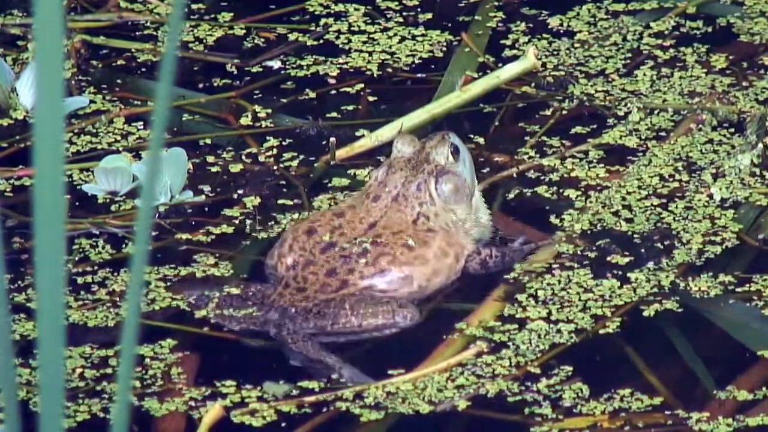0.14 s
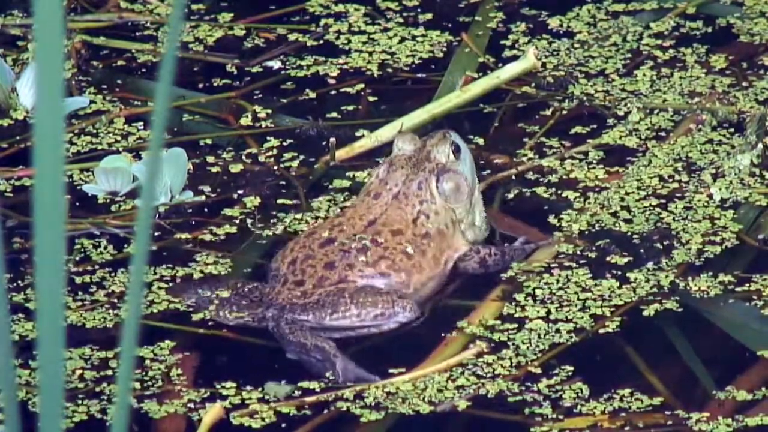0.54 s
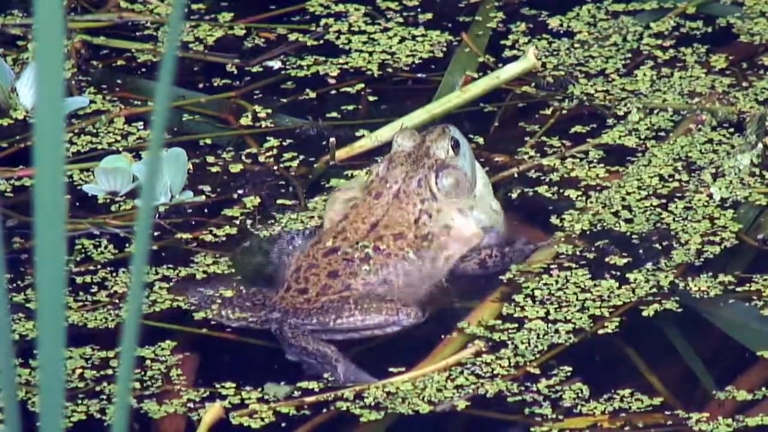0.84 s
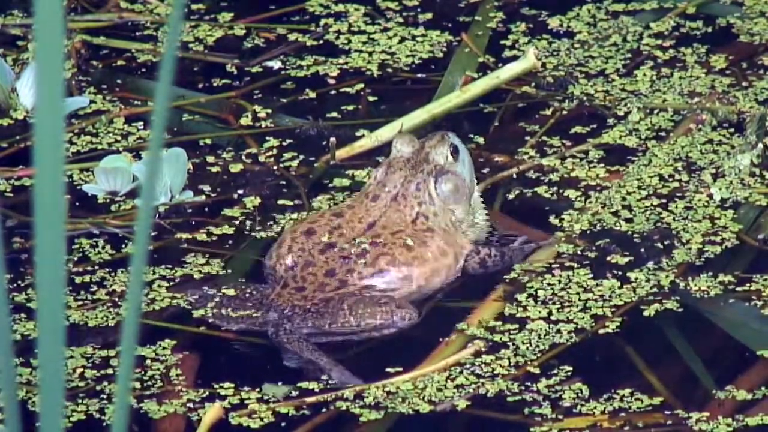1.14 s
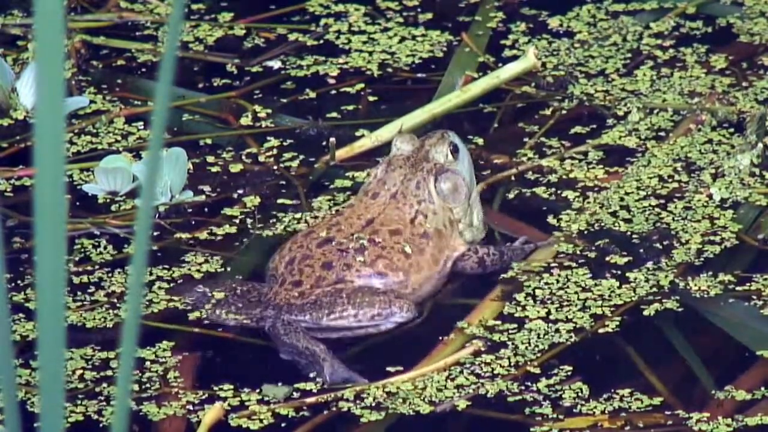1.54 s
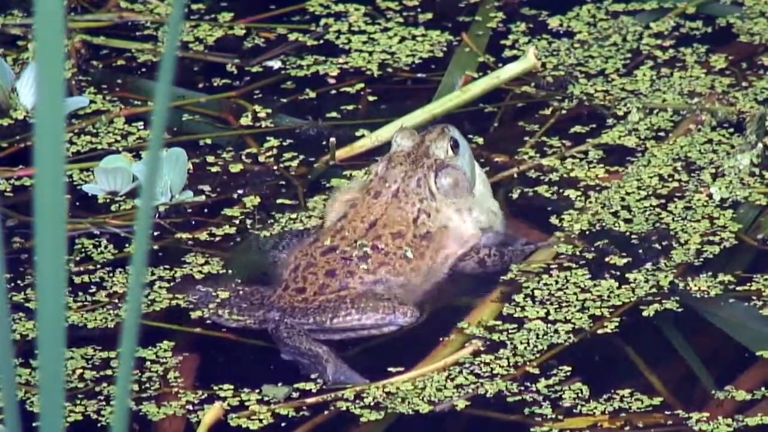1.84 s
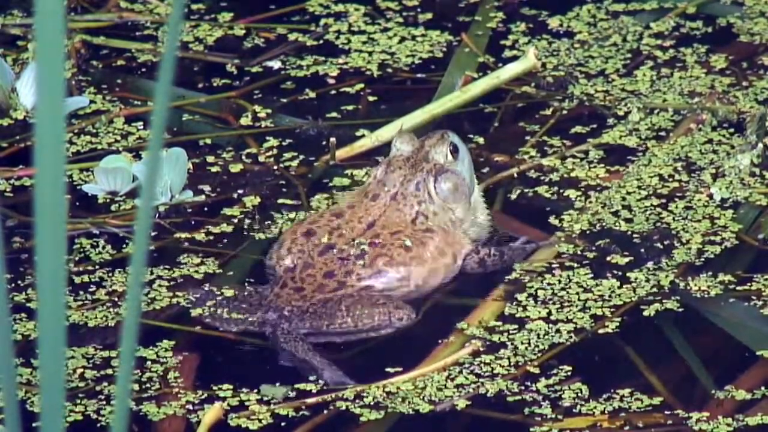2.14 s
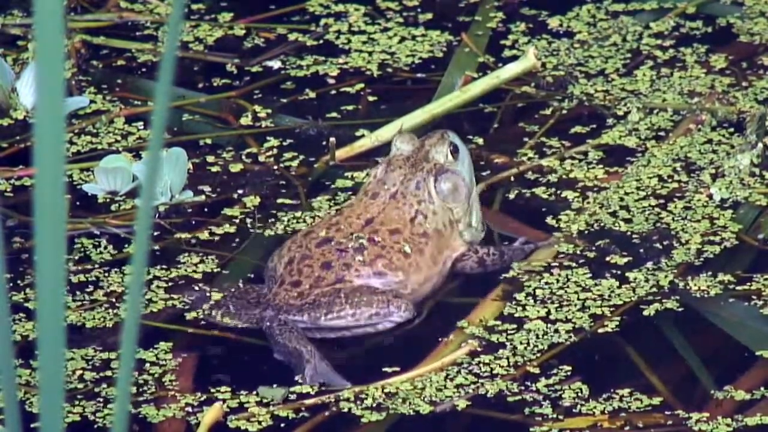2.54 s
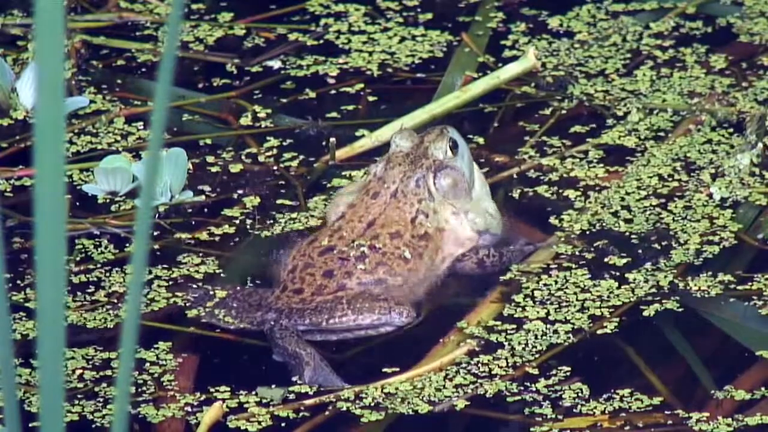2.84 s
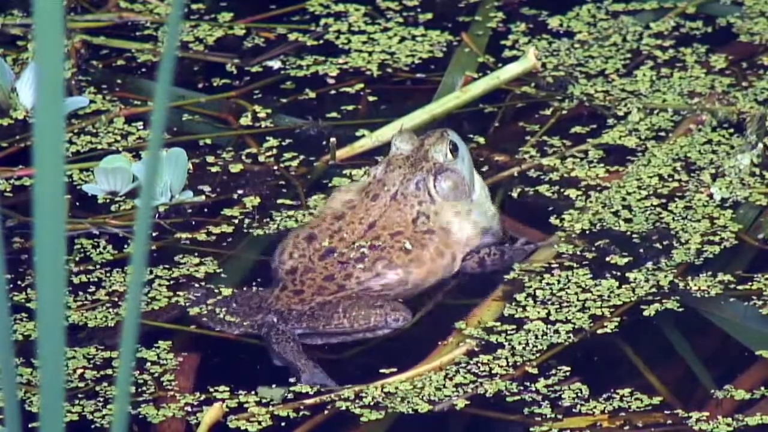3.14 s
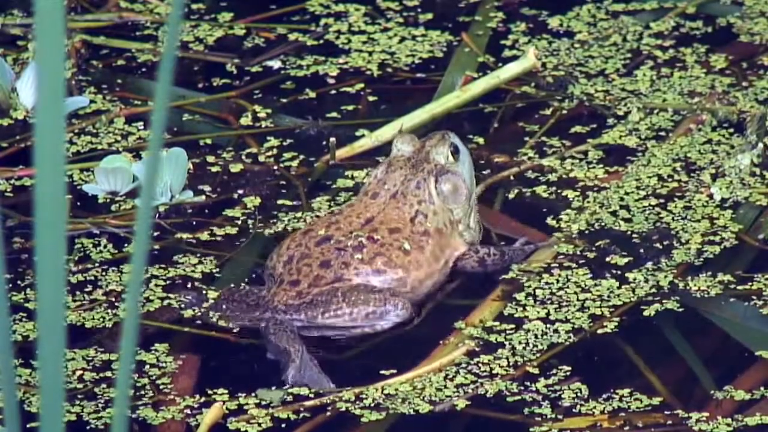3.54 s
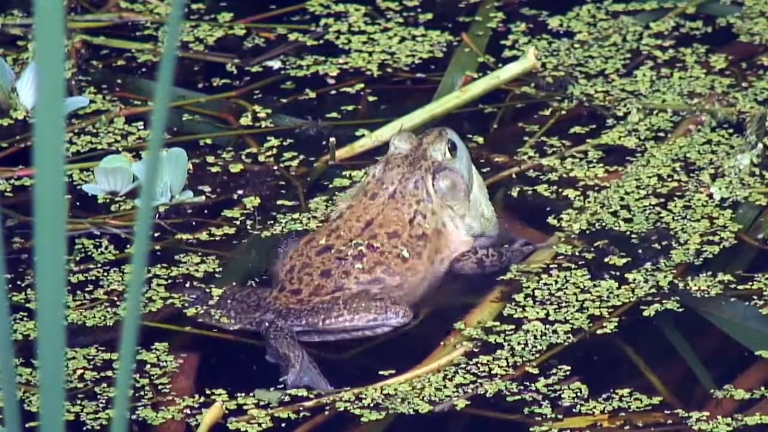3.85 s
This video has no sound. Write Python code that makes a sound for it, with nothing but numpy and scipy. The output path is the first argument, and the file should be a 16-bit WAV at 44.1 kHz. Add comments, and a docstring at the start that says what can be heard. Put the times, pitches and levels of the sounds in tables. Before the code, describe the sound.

A bullfrog bellows four deep, throbbing croaks in a pond with insect hiss and distant hum.

```python
"""Bullfrog at a pond's edge

Heard in stereo: a bullfrog croaks four times. Glottal clicks near 100 a second ring its throat, while
the vocal sac booms on the low harmonics and throbs; water and reeds scatter short echoes of the clicks.
Two distant motors hum as steady shaft orders, one sagging in speed. Coloured noise makes an insect chorus
hiss, pulsed noise a near insect that starts up on the left, and ringing noise a faint far call."""
import sys
import numpy as np
from scipy import signal
from scipy.io import wavfile
from scipy.ndimage import uniform_filter1d

SR = 44100
rng = np.random.default_rng(int(sys.argv[2]) if len(sys.argv) > 2 else 0)


def waveform_to_disk(signal):
    """Save audio, clipped to [-1, 1], as 16-bit WAV at the path in sys.argv[1]."""
    frames = np.transpose(np.atleast_2d(signal))
    scaled = np.clip(frames, -1, 1) * 32767
    samples = np.round(scaled).astype(np.int16)
    wavfile.write(sys.argv[1], SR, samples)


N = 176400  # four seconds


def amp(db):
    """Amplitude factor of a level in dB."""
    return 10 ** (np.asarray(db) / 20)


def evened(x):
    """The signal scaled to rms 1."""
    return x / np.sqrt(np.mean(x ** 2) + 1e-20)


def read(points, hz):
    """Values of a (f/Hz, value) table, interpolated along log frequency."""
    f, value = np.transpose(points)
    return np.interp(np.log(hz + 1), np.log(f + 1), value)


def follow(points, t):
    """Values of a (t/s, value) table at the times t."""
    return np.interp(t, *np.transpose(points))


def wander(size):
    """Slow chance of rms 1: noise averaged twice over size samples."""
    return evened(uniform_filter1d(uniform_filter1d(rng.standard_normal(N), size), size))


def resonate(x, hz, width):
    """A resonance of gain 1 that follows the curve hz: shift to 0 Hz, smooth, shift back."""
    turn = np.exp(2j * np.pi * np.cumsum(hz * np.ones(len(x))) / SR)
    r = np.exp(-np.pi * width / SR)
    return 2 * (turn * signal.lfilter([1 - r], [1, -r], x / turn)).real


def ring(x, hz, width):
    """A steep-sided resonance: three passes, rms 1."""
    twice = resonate(resonate(x, hz, width), hz, 0.9 * width)
    return evened(resonate(twice, hz, 2 * width))


def lowpass(x, order, hz):
    """Butterworth low-pass."""
    return signal.sosfilt(signal.butter(order, hz, fs=SR, output="sos"), x)


def pan(db):
    """Channel gains that make the left louder than the right by db."""
    return amp([[db / 2], [-db / 2]])


def hiss(spectrum, same, patchy_db):
    """Two-channel noise of a given colour and left-right likeness with drifting patches, rms 1."""
    hz = np.fft.rfftfreq(1024, 1 / SR)
    a, b, c, d, patch = rng.standard_normal((N // 256 + 5, 513, 5)).T
    patch = uniform_filter1d(patch, size=10, axis=0)
    patch = evened(uniform_filter1d(patch, size=10, axis=1))
    same = np.clip(same * np.ones(513), -1, 1)[:, None]
    left = a + 1j * b
    right = same * left + np.sqrt(1 - same ** 2) * (c + 1j * d)
    z = np.array([left, right]) * amp(read(spectrum, hz)[:, None] + patchy_db * patch)
    return evened(signal.istft(z, nperseg=1024, noverlap=768)[1][:, :N])


# colour of the air and the insect chorus: (f/Hz, level/dB per Hz, relative)
AIR_COLOUR = [(20, -34), (35, -38.5), (65, -5), (120, -21), (170, -20), (250, -20), (400, -19.5),
              (580, -28.5), (950, -25.5), (1300, -28), (2500, -40), (5500, -44), (7100, -39), (8300, -33.5),
              (9600, -25), (11000, -31.5), (12500, -43), (15400, -50)]
# how alike the air is in left and right: (f/Hz, likeness [1 = identical])
AIR_LIKENESS = [(60, 0.91), (180, 0.74), (550, 0.6), (1650, 0.9), (4970, 0.041), (15000, 0.05)]
AIR_DB, AIR_PATCHY_DB = -36, 1.2


def air_and_chorus():
    """The bed all around: noise, alike in both channels at the bottom and nearly unlike in the treble."""
    likeness = read(AIR_LIKENESS, np.fft.rfftfreq(1024, 1 / SR))
    return amp(AIR_DB) * hiss(AIR_COLOUR, likeness, AIR_PATCHY_DB)


# shaft orders of the steady motor: (order [multiple of shaft speed], level/dB)
STEADY_ORDERS = [(1, -38.5), (2, -38.5), (5, -46), (7, -49.5), (8, -57)]
# shaft speed of the sagging motor: (t/s, f/Hz)
SAGGING_SPEED = [(0.0, 97.2), (0.13, 96), (1.84, 96.1), (2.07, 91), (2.29, 82.6), (2.84, 82.53),
                 (3.01, 83.4), (3.65, 92.18), (4.0, 92.4)]
# shaft orders of the sagging motor: (order [multiple of shaft speed], level/dB)
SAGGING_ORDERS = [(.5, -52), (1, -38.5), (1.5, -53.5), (2.5, -46)]
STEADY_HZ, HUM_PAN_DB, HUM_WAVER_DB = 51.8, -1.3, 1.5


def motors():
    """Far off: sines on the shaft orders of a steady and a sagging motor, each wavering a little."""
    t = np.arange(N) / SR
    speed = uniform_filter1d(follow(SAGGING_SPEED, t), size=4000)
    turns = np.cumsum(speed) / SR
    lines = [(order * STEADY_HZ * t, db) for order, db in STEADY_ORDERS]
    lines += [(order * turns, db) for order, db in SAGGING_ORDERS]
    hum = 0
    for phase, db in lines:
        level = amp(db + HUM_WAVER_DB * wander(size=5000))
        hum = hum + level * np.sqrt(2) * np.cos(2 * np.pi * (phase + rng.random()))
    return hum * pan(HUM_PAN_DB)


# one distant call: (start t/s, length t/s, from f/Hz, to f/Hz, width f/Hz, level/dB before its fade)
DISTANT_CALL = (.09, 0.24, 1398, 1230, 29, -48)


def far_call():
    """A faint call far across the pond: noise through a falling resonance, faded in and out."""
    start, length, f0, f1, width, db = DISTANT_CALL
    share = np.clip((np.arange(N) / SR - start) / length, 0, 1)
    hz = f0 + (f1 - f0) * np.sqrt(share)
    return amp(db) * np.sin(np.pi * share) * evened(resonate(rng.standard_normal(N), hz, width))


# colour of the near insect: (f/Hz, level/dB per Hz, relative)
INSECT_COLOUR = [(3240, -46), (5500, -30.5), (6290, -25), (7100, -16), (8080, -8.5), (8660, -5.5),
                 (9770, -0.5), (12600, -15), (14500, -22), (15400, -34)]
# mean level of the near insect, before its pulses: (t/s, level/dB)
INSECT_LEVEL = [(1.475, -84), (1.49, -37.5), (1.9, -34.5), (2.05, -32.5), (2.8, -29), (4, -29)]
STROKES_PER_S, STROKE_PEAK_S, STROKE_DEPTH_DB = 25.9, 2.155, 2.5
INSECT_LIKENESS, INSECT_PAN_DB = -.25, 6.5  # negative likeness: the channels partly oppose


def insect():
    """Close by on the left: treble rasp pulsed by the wing strokes."""
    t = np.arange(N) / SR
    strokes = STROKES_PER_S * (t - STROKE_PEAK_S) + 0.075 * wander(size=1500)
    level_db = follow(INSECT_LEVEL, t) + STROKE_DEPTH_DB * np.cos(2 * np.pi * strokes)
    level_db = level_db + 0.27 * wander(size=600)
    rasp = hiss([(5000, -47)] + INSECT_COLOUR, INSECT_LIKENESS, 1.17)
    return rasp * amp(level_db) * pan(INSECT_PAN_DB)


REEDS_DB, REEDS_T60_S = -14.5, .2


def reeds(x):
    """Short scattered echoes from water and reeds, other ones for each ear."""
    first = 300  # samples before the earliest echo
    t = np.arange(first, SR // 4) / SR
    chosen = rng.random((2, len(t))) < .05
    taps = rng.standard_normal((2, len(t))) * chosen * amp(-60 * t / REEDS_T60_S)
    taps = np.pad(taps, ((0, 0), (first, 0)))
    return amp(REEDS_DB) * signal.fftconvolve(x[None], taps / np.linalg.norm(taps[0]), axes=1)[:, :N]


# the voice swells, then catches: (t/s, depth level/dB)
CATCHES = [(0.443, 10), (0.549, 7.5), (0.666, 4.5), (.775, 3), (1.45, 9.5), (1.563, 9.5), (1.683, 7),
           (1.8, 3.5), (2.47, 10), (2.588, 8), (2.704, 7), (2.832, 7), (3.57, 7.5), (3.686, 8), (3.799, 7),
           (3.922, 2)]
SWELL_S, CATCH_S, RECOVER_S = .03, .006, 0.041


def throb(t):
    """The swell before each catch and the dip after it, both in dB."""
    s, db = np.transpose(CATCHES)
    d = t[:, None] - s
    late = np.maximum(d, 0)
    swell = np.where(d < 0, np.exp(np.minimum(d, 0) / SWELL_S), np.exp(-late / CATCH_S))
    dip = (1 - np.exp(-late / CATCH_S)) * np.exp(-(late / RECOVER_S) ** 2)
    return swell @ db, dip @ db


MINOR_DB, MINOR_EARLY_DB, MINOR_SPREAD_DB = -12, -6, 3.5  # base, extra at the start, chance
MINOR_JITTER, MINOR_GROW = .035, .65  # cycles of a third; share of the croak until full level
SWELL_ECHO, RASP_DB = .12, -14  # weak clicks' gain per dB of swell; noise among the clicks


def glottis(turns, limp, share, swell):
    """Per cycle one strong click, every second one shifted, and two weak ones; with rasping noise."""
    main = np.diff(np.floor(turns + limp * np.cos(np.pi * turns)), prepend=0)
    thirds = 3 * (turns + MINOR_JITTER * wander(size=200))
    apart = abs(turns - np.round(turns)) > .15  # none beside a strong click
    minor = (np.diff(np.floor(thirds), prepend=0) > 0) * apart
    minor_db = MINOR_DB + MINOR_EARLY_DB * np.clip(1 - share / MINOR_GROW, 0, 1)
    minor_db = minor_db + MINOR_SPREAD_DB * np.clip(rng.standard_normal(N), -2, 1.5)
    minor = minor * amp(minor_db) * (1 + SWELL_ECHO * swell)
    rasp = amp(RASP_DB) * rng.standard_normal(N) / np.sqrt(SR / 100)
    return main * amp(0.4 * rng.standard_normal(N)) + minor + rasp


# throat resonances: (f/Hz, width f/Hz, level/dB, rise as the throat tightens [share],
# brightness followed [share])
THROAT_RINGS = [(891, 267, -12.5, 0.04, 0.039), (1288.5, 169, -4.5, 0.13, 0), (1672, 707, 2.5, 0.27, 0.34),
                (2037, 714, -1.5, 0.25, 0.96), (3420, 2040, -16, 0.28, 0.86)]
# breath bands gliding over each croak: (from f/Hz, to f/Hz, width f/Hz, level/dB)
WHEEZE_BANDS = [(5760, 4840, 170, -27), (6530, 5300, 430, -27), (7840, 6960, 1700, -29)]
BODY_TOP_HZ, TOP_HZ, WHEEZE_WOBBLE_HZ = 2560, 4350, 40


def throat(drive, breath, share, bright_db):
    """Clicks ring resonances that rise as the throat tightens; breath wheezes above them."""
    tight = np.clip(share, 0, 1)
    rings = []
    for f, width, db, rise, followed in THROAT_RINGS:
        hz = f * (1 + rise * (tight - .7))
        rings.append(amp(db + followed * bright_db) * ring(-drive, hz, width))
    body = .5 * lowpass(sum(rings[:-1]), 6, BODY_TOP_HZ)
    voice = lowpass(body - rings[-1], 8, TOP_HZ)
    for f0, f1, width, db in WHEEZE_BANDS:
        hz = f0 + (f1 - f0) * tight + WHEEZE_WOBBLE_HZ * wander(size=700)
        wheeze = evened(resonate(resonate(breath, hz, width), hz, width))
        voice = voice + amp(db + 2 * bright_db) * wheeze
    return voice


# tones of the vocal sac: (harmonic [multiple of click rate], level/dB relative)
SAC_TONES = [(2, -1.5), (3, 0.5), (4, -8), (5, -24), (6, -14.5), (7, -27), (8, -15), (9, -13.5),
             (2.5, -13.5), (3.5, -11.5)]
BOOM_LAG_S, BOOM_WAVER_DB, BOOM_SIDE_DB = .0017, .7, -11.5


def vocal_sac(turns, pitch, breath, over_db):
    """Pure low harmonics lagging the clicks, with gurgling breath; also their left-right difference."""
    late = 2 * np.pi * (turns - pitch * BOOM_LAG_S)
    boom = 0
    for harmonic, db in SAC_TONES:
        level = amp(db + (harmonic > 2) * over_db + BOOM_WAVER_DB * wander(size=500))
        boom = boom + level * np.sqrt(2) * np.cos(harmonic * late)
    hz, width = 350, 260
    gurgle = amp(-17) * evened(resonate(resonate(breath, hz, width), hz, width))
    side = amp(BOOM_SIDE_DB) * amp(over_db) * (np.sin(3 * late) + 0.44 * np.sin(2 * late))
    return boom + gurgle, side


# the four croaks: (start t/s, length t/s, base level/dB, boom against clicks level/dB)
CROAK_TIMES = [(0.389, 0.54, -16, 1), (1.383, 0.56, -16, 1), (2.403, .595, -14.5, 0.5),
               (3.49, 0.56, -14, 0)]
# course of one croak: (share of length, clicks level/dB, brightness level/dB, boom level/dB,
# boom overtones level/dB, limp of every second click [cycles])
CROAK_SHAPE = [(0, -25, -11.5, -24.5, -8, .01), (.05, -5.5, -25, -15.5, -12, .02),
               (.2, -5.5, -4, -8.5, -13, .02), (.4, -1, -2, -4, -9, .025), (.6, -1, 0.5, -3.5, -7, .015),
               (.8, 0.5, 2, -2, -3.5, .01), (.94, -3.5, 2, -4.5, -2, .004), (1.0, -7, 0.5, -2.5, -9, .004),
               (1.03, -18.5, -1, -10, -6.5, .004), (1.11, -32.5, 9, -12, -11, .004),
               (1.17, -53, 12, -46, 26, .004), (1.25, -70, 0, -66, -4, .004)]
# base click rate, before swell and jitter: (t/s, f/Hz)
CLICK_RATE = [(.4, 92), (.5, 95.5), (.6, 98), (.7, 100.5), (.8, 102.5), (.86, 104), (.91, 107), (.95, 103),
              (1.02, 96), (1.385, 92), (1.5, 95), (1.6, 98.5), (1.7, 101), (1.78, 102.5), (1.85, 106),
              (1.93, 107), (1.97, 103), (2.05, 97), (2.405, 92), (2.5, 96.5), (2.62, 100), (2.74, 102),
              (2.85, 106), (2.97, 109.5), (3.02, 105), (3.09, 93), (3.49, 91), (3.6, 97), (3.72, 101),
              (3.84, 103), (3.9, 106), (4, 110.5)]
SWELL_PITCH, JITTER = .007, .004  # share of the rate: per dB of swell; rms of the chance
SWELL_SHARE, CLICK_SHARE, PUFF = 0.18, .6, .25  # swell in levels; dip in clicks; breath floor and decay


def frog():
    """Nearest the microphones: glottal clicks through the throat, and the vocal sac's boom."""
    t = np.arange(N) / SR
    starts, lengths, levels, booms = np.transpose(CROAK_TIMES)
    k = np.clip(np.searchsorted(starts, t) - 1, 0, None)  # the croak under way
    share = (t - starts[k]) / lengths[k]
    at, *courses = np.transpose(CROAK_SHAPE)
    click_db, bright_db, boom_db, over_db, limp = [np.interp(share, at, c) for c in courses]
    swell, dip = throb(t)
    on = (share > 0) * amp(levels[k])

    pitch = follow(CLICK_RATE, t)
    turns = np.cumsum(pitch * (1 + SWELL_PITCH * swell + JITTER * wander(size=150))) / SR
    drive = glottis(turns, limp, share, swell)
    breath = (PUFF + np.exp(-(turns % 1) / PUFF)) * rng.standard_normal(N)  # a puff each cycle

    clicks = on * amp(click_db + SWELL_SHARE * swell - CLICK_SHARE * dip)
    clicks = clicks * throat(drive, breath, share, bright_db)
    sac = on * amp(booms[k] + boom_db + SWELL_SHARE * swell - dip)
    boom, side = vocal_sac(turns, pitch, breath, over_db)
    return clicks, sac * boom, sac * side


def scene():
    """The pond around, then the frog with its echoes."""
    pond = air_and_chorus() + motors() + far_call() + insect()
    clicks, boom, side = frog()
    return pond + reeds(clicks) + clicks + boom + side * [[1], [-1]]


EDGE_HZ = 15350


def record(dry):
    """The band limit: a linear-phase low-pass."""
    taps = signal.firwin(511, EDGE_HZ, window=("kaiser", 9), fs=SR)
    return signal.oaconvolve(dry, taps[None], "same")


dry = scene()
out = record(dry)
waveform_to_disk(out)
```